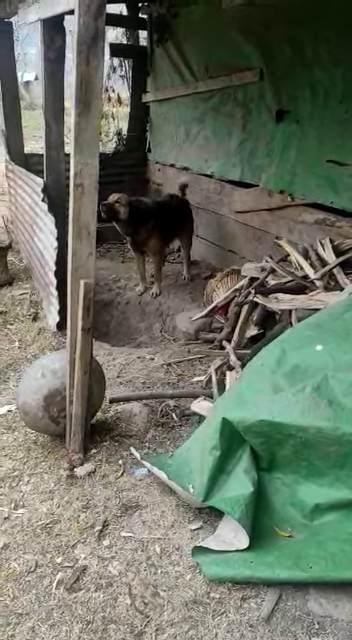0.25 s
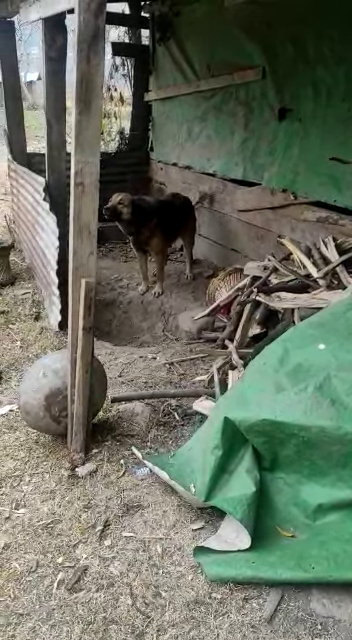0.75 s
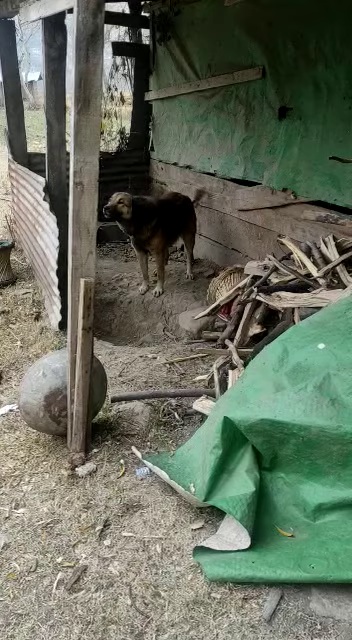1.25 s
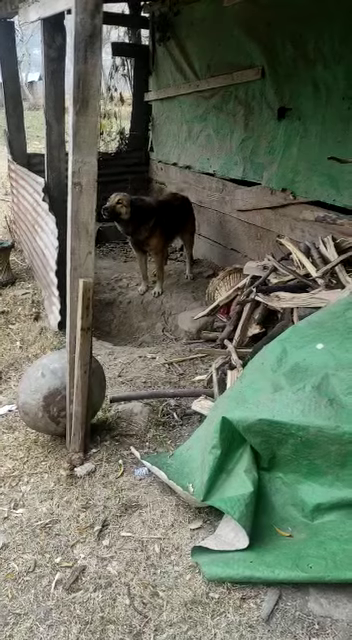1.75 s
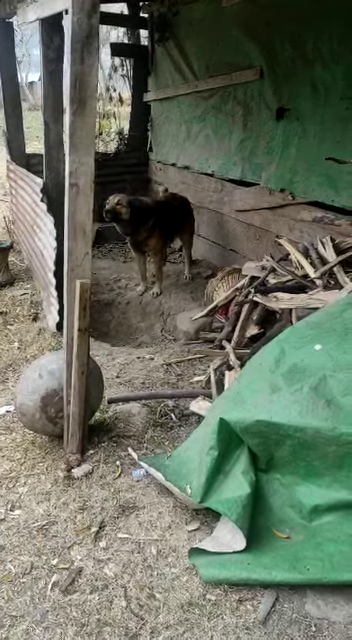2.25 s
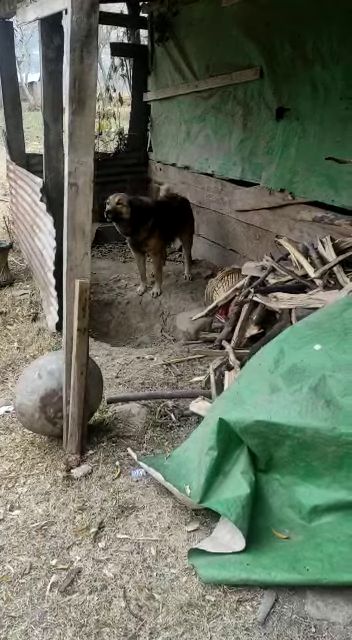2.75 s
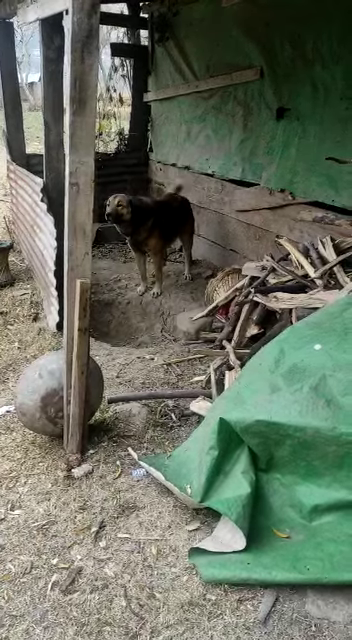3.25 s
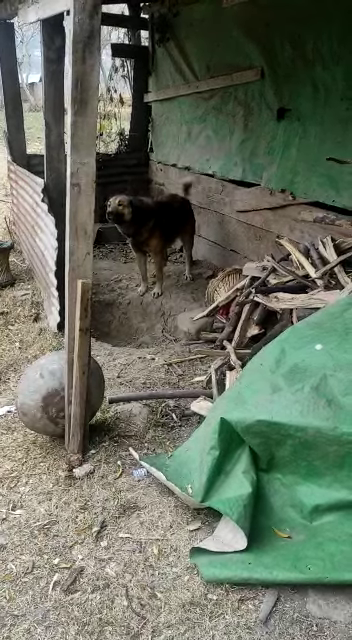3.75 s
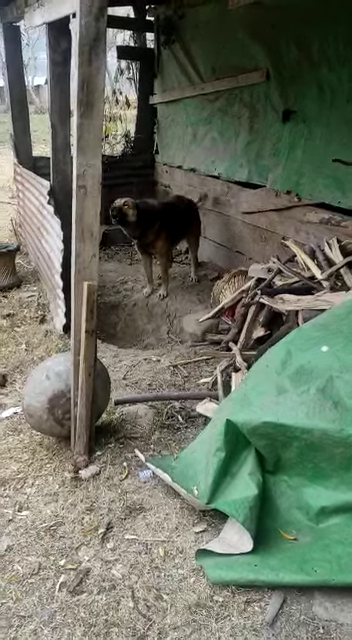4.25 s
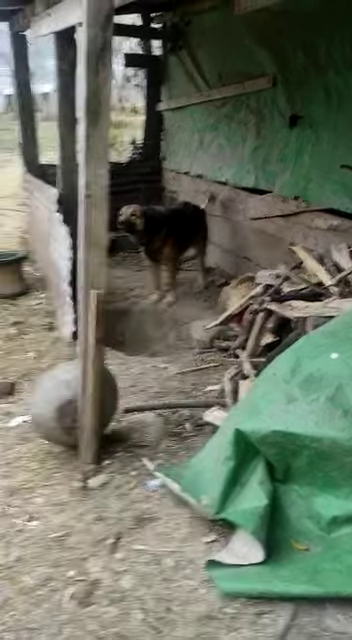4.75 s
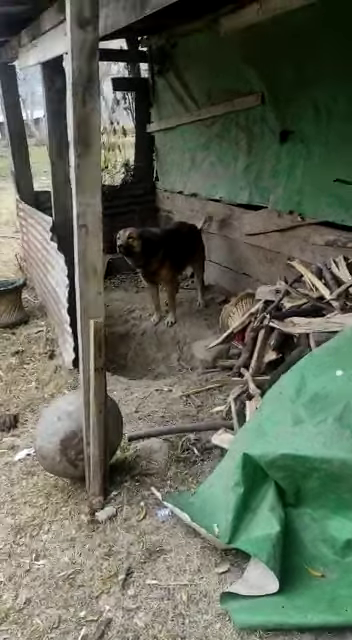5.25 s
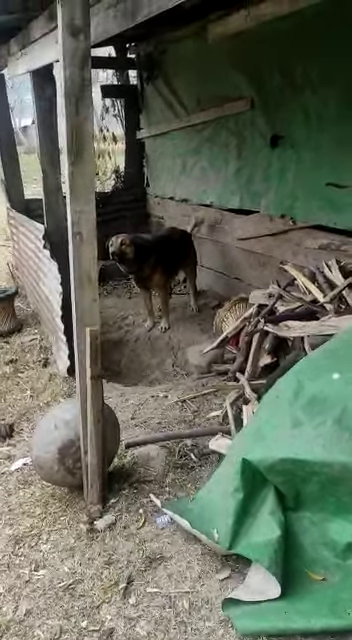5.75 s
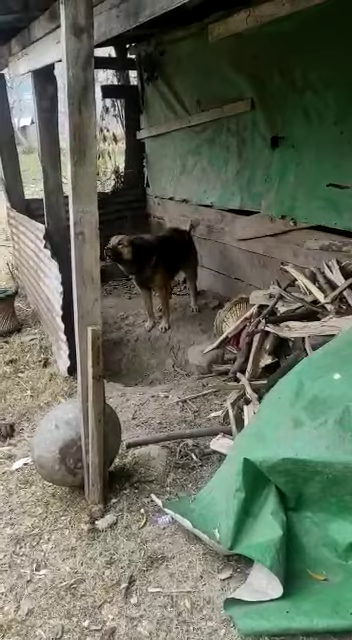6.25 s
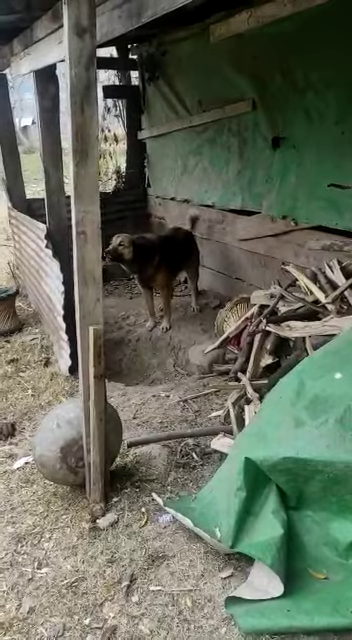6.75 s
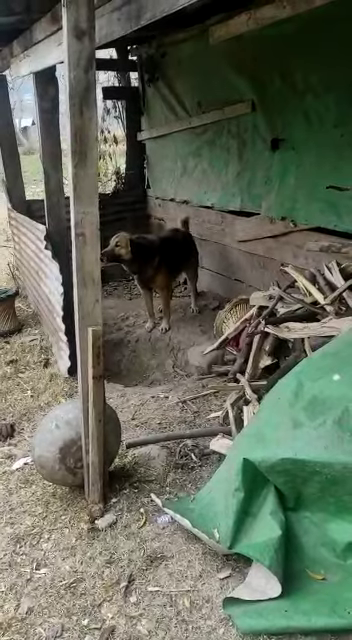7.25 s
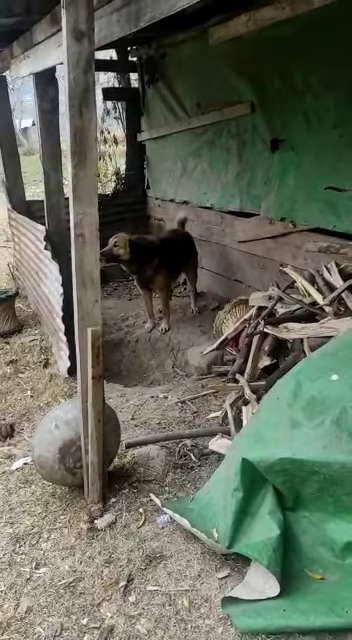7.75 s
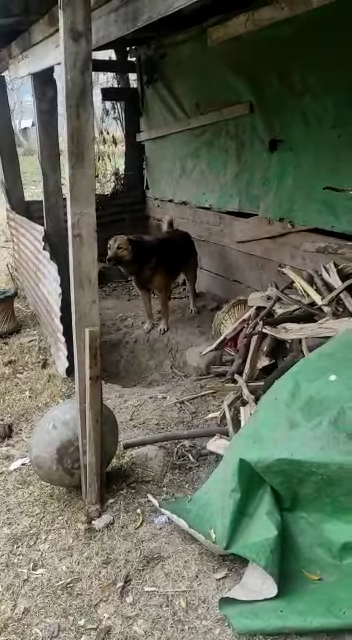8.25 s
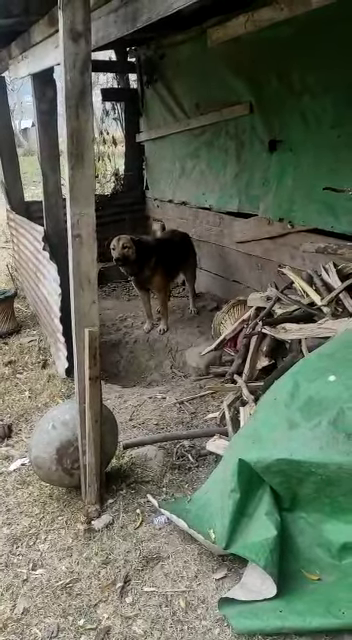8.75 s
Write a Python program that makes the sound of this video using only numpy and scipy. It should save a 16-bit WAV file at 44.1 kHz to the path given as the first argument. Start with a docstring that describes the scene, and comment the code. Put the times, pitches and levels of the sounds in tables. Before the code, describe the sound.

A large dog barks in short runs outdoors, with low growls and faint whines in the pauses.

```python
"""A yard with an open plank shed, where a large dog barks in short runs a few metres away.
Each bark starts as a rasp of flapping vocal folds, locks into a ringing arch of pitch and falls apart.
In the pauses slack folds growl, a thin whine comes through the nose and the jaw ticks shut.
The shed rings briefly and the yard echoes faintly over a bed of outdoor air;
in the second half, gusts brush the microphone."""
import sys
import numpy as np
from scipy import signal
from scipy.fft import irfft
from scipy.io import wavfile
from scipy.ndimage import map_coordinates

SR = 44100
rng = np.random.default_rng(int(sys.argv[2]) if len(sys.argv) > 2 else 0)


def store_pcm(level_fs):
    """Save levels as 16-bit WAV."""
    pcm = np.round(np.clip(level_fs, -1, 1) * 32767).astype(np.int16)
    wavfile.write(sys.argv[1], SR, np.atleast_2d(pcm).T)


N = 397771
T = np.arange(N) / SR

# the bed of outdoor air: (frequency [Hz], gain [dB])
YARD_AIR = [(25, -1.5), (60, -1), (130, -8.5), (300, -7.5), (600, -10.5), (1000, -21), (2000, -23),
            (4500, -38.5), (6000, -32), (8200, -24.5), (10300, -45.5), (15000, -53)]
# wind thumping on the microphone: (frequency [Hz], gain [dB])
WIND_BUFFET = [(15, 3), (45, 1.5), (90, -6), (160, -14.5), (300, -28.5), (700, -35), (2000, -64)]
# gusts: (peak time [s], half length [s], relative level [dB])
WIND_GUSTS = [(5.52, .04, -53), (5.66, .05, -49), (5.89, .05, -46), (6.25, .03, -46), (6.4, .05, -42),
              (6.54, .025, -45), (6.86, .09, -39), (7.09, .11, -40), (7.33, .035, -47), (7.45, .06, -44),
              (8.03, .06, -45.5), (8.26, .1, -50)]
# returns from the near planks, the whole shed and the yard: (frequency [Hz], gain [dB])
PLANK_SLAP = [(300, -24.5), (1000, -14.5), (1800, 1.5), (4000, 6.5), (12000, 4.5)]
SHED_REVERB = [(100, -3.5), (400, -8.5), (950, -19), (1500, -7), (3000, -8), (12000, -4)]
YARD_REVERB = [(100, -30.5), (400, -33), (1000, -34), (2300, -26.5), (5000, -28.5), (12000, -59)]
# posts and a tin wall shade the two microphone ports: (frequency [Hz], left minus right [dB])
PORT_SHADE = [(100, 2.5), (230, 6.5), (330, 5), (560, 2), (900, 5.5), (1300, 1), (2300, -3.5), (5000, -1.5),
              (6700, -12), (8300, 6.5), (15000, -3.5)]
# teeth and lips clicking: (time [s], peak level [dB])
JAW_CLICKS = [(.639, -50.5), (.98, -60), (2.59, -57)]
# whines: (start [s], length [s], top pitch [Hz], relative level [dB], flutter [share of pitch])
WHINE_CUES = [(.87, .26, 508, -60.5, .045), (1.53, .29, 492, -60, .05), (3.22, .25, 450, -70, .06),
              (3.74, .28, 466, -72, .055), (4.38, .24, 468, -73, .07), (8.84, .25, 395, -81, .04)]
# nasal resonances: (frequency [Hz], gain [dB])
NOSE_TONE = [(400, -12.5), (950, -9.5), (1450, -5.5), (1800, 2.5), (2030, 5.5), (2400, -17), (3200, -51),
             (4200, -38), (7000, -31)]
# growls: (start [s], length [s], top pulse rate [Hz], relative level [dB], fade [dB/s])
GROWL_CUES = [(.85, .29, 97, -49, 130), (1.497, .56, 93.5, -48.5, 21), (2.497, .16, 92, -51, 170),
              (4.67, .13, 85, -58, 200)]
# a growl's breath, and its fold slaps muffled by the nearly closed mouth: (frequency [Hz], gain [dB])
GROWL_BREATH = [(50, -18.5), (85, 5.5), (130, -16.5), (190, 9), (280, -3.5), (360, 7), (480, -3),
                (700, -6.5), (860, 1), (1200, -17), (1600, -13), (3200, -50), (5000, -40), (8500, -48),
                (10500, -71)]
GROWL_RUMBLE = [(50, -19.5), (85, -1.5), (130, -5.5), (200, 4.5), (280, -3.5), (360, 3), (480, -14.5),
                (700, -12.5), (860, -16), (1200, -23.5), (3200, -53.5), (10000, -72)]
# barks: (crest time [s], lead-in [s], top pitch [Hz], stretch [factor], tone trim [dB], chest trim [dB],
# rasp trim [dB], mouth trim [dB], hiss trim [dB], tone left minus right [dB])
BARK_CUES = [(.187, .104, 309, .95, -2.2, -1, 1.5, -2, 0, .5),
             (.534, .087, 312, 1.1, -5, 2.5, 3.5, -3.5, -2, -2.5),
             (2.137, .102, 335, 1.14, 1.5, -1, .5, -2, .5, -3.5),
             (2.957, .091, 326, 1.05, -2, .5, 2, -3, -1, 2),
             (3.597, .091, 332, .98, 0, -.5, -.5, 1, 3.5, -8),
             (3.973, .094, 321, 1.06, -1.5, -.5, -.5, -2, -.5, -2),
             (4.322, .085, 317, .87, 0, -2.5, 1, 1, 0, -1.5),
             (5.061, .083, 324, .98, -.5, -1, .5, 4.5, 5, -2),
             (5.947, .091, 326, 1.02, -1, 1, .5, -.5, .5, 2.5),
             (6.3, .090, 316, 1.0, .3, -1.5, -.5, 1, -.5, 1.5),
             (6.718, .097, 318, .94, 1.3, -2, -.5, 2, 0, .5),
             (7.113, .089, 318, .92, -1.8, 1, 2.5, -2, -.5, 1.5),
             (8.157, .097, 332, 1, .5, .5, 0, -.5, -1, -.5),
             (8.512, .092, 315, 1.01, -2, -.5, -3, -2.5, -2, 1)]
# the throat as the folds sound through it: (frequency [Hz], gain [dB])
THROAT_TONE = [(130, -18), (190, -8), (250, -13), (320, -12), (450, -5), (570, -4), (650, -19),
               (780, -15.5), (900, -1), (948, 3.5), (1000, -6), (1110, -13), (1300, -10), (1750, -41),
               (2280, -26)]
# the same tract under turbulent air, jaw open and jaw closing: (frequency [Hz], gain [dB])
RASP_OPEN = [(70, -23), (150, -20), (230, -10), (320, 1.5), (480, 5), (680, 0.5), (790, 0.5), (920, 8),
             (1090, -7.5), (1450, -2), (1850, -27.5), (2320, -9.5), (3200, -53), (5000, -52)]
RASP_CLOSING = [(70, -29), (130, -15.5), (185, 1.5), (260, -4), (320, -0.5), (430, 1), (540, 10),
                (790, -13), (930, -11), (1250, -16), (1700, -35.5), (3200, -56.5)]
# the open mouth's resonance, and air rushing over tongue and teeth: (frequency [Hz], gain [dB])
MOUTH_RING = [(1100, -19.5), (1500, -5.5), (1900, -8.5), (2320, 3.5), (2700, -7.5), (3300, -16),
              (4400, -42.5)]
TEETH_HISS = [(2000, -27), (3100, -5.5), (3800, -5), (4450, -12), (5000, 4), (6400, 3), (7500, -5.5),
              (8400, -3), (9200, -17.5), (9700, -32), (14500, -28.5)]
# layer envelopes of a bark, before its trims and stretch:
# (level [dB], rise [dB/s], hold before the crest [s], hold after it [s], fall [dB/s])
TONE_SWELL = (-16.9, 480, .023, .024, 450)
RASP_SWELL = (-31.4, 330, .046, .042, 330)
MOUTH_SWELL = (-45.7, 560, .048, .035, 360)
HISS_SWELL = (-48.5, 400, .044, .04, 540)


def undb(db):
    """Decibels to gain."""
    return 10 ** (np.asarray(db) / 20)


def colour(x, spectrum, size=8192):
    """Ring a sound through a resonant body with this (frequency [Hz], gain [dB]) curve."""
    hz, db = np.transpose(spectrum)
    bins_hz = np.maximum(np.abs(np.fft.fftfreq(size, 1 / SR)), 1)
    log_gain = np.log(undb(np.interp(np.log(bins_hz), np.log(hz), db)))
    minimum_phase = np.exp(signal.hilbert(log_gain).conj())[:size // 2 + 1]
    ring = irfft(minimum_phase)[:size // 2]
    return signal.oaconvolve(x, ring if x.ndim == 1 else ring[None], axes=-1)[..., :x.shape[-1]]


def shift(x, factor):
    """Varispeed: slide all resonances of a noise by a moving factor."""
    return map_coordinates(x, [np.cumsum(factor)], order=3, mode="mirror")


def unit(x):
    """Scale to rms 1."""
    return x / np.sqrt(np.mean(x ** 2))


def wander(t, rate):
    """Smooth random drift with a spread near 1, changing rate times a second."""
    return map_coordinates(rng.standard_normal(4096), [(t - t[0]) * rate], order=3, mode="wrap")


def swell(age, db, rise_db_per_s, before, after, fall_db_per_s):
    """An envelope that rises, holds around age zero and falls."""
    early, late = np.maximum(-before - age, 0), np.maximum(age - after, 0)
    return undb(db - rise_db_per_s * early - fall_db_per_s * late)


def ramp(age, length):
    """A linear fade from 0 to 1."""
    return np.clip(age / length, 0, 1)


def bell(x, width):
    """A smooth hump, 1 at zero."""
    return np.exp(-(x / width) ** 2)


def span(start, end):
    """The sample times between two moments."""
    return T[(T >= start) & (T < end)]


def add(track, t, sound):
    """Lay a sound on a track at its times."""
    i = round(t[0] * SR)
    track[..., i:i + len(t)] += sound


def yard(db=-69, side_db=-4):
    """A faint, wide bed of slowly wavering outdoor air."""
    mid, side = unit(colour(rng.standard_normal((2, N)), YARD_AIR))
    side = side * undb(side_db)
    return np.array([mid + side, mid - side]) * undb(db + 1.2 * wander(T, 4))


def breeze(start_s=5.3, left_db=3, right_db=-10, eddy_db=3):
    """Gusts ride on a light breeze; their eddies thump on each port separately, mostly the left."""
    light = undb(-63) * ramp(T - start_s, .15)
    gusts = sum(undb(db) * bell(T - at, half) for at, half, db in WIND_GUSTS)
    buffet = unit(colour(rng.standard_normal((2, N)), WIND_BUFFET))
    eddies = buffet * (light + gusts) * undb(eddy_db * wander(T, 22))
    return eddies * undb([[left_db], [right_db]])


def reverb(x, spectrum, t60, delay, build):
    """Scattered reflections build up and die away, different at each port; times in seconds."""
    t = span(0, 1.2)
    late = np.maximum(t - delay, 0)
    shape = (1 - np.exp(-late / build)) * np.exp(-np.log(1000) * late / t60)
    scatter = rng.standard_normal((2, len(t))) * shape / np.sqrt(np.sum(shape ** 2))
    return signal.fftconvolve(x, colour(scatter, spectrum), axes=1)[:, :N]


def shed(dog, port_lag_ms=.115, head_swing_hz=.6):
    """The direct sound reaches the right port first; planks, shed and yard answer after it."""
    direct = np.array([np.roll(dog[0], round(port_lag_ms * SR / 1000)), dog[1]])
    ring = reverb(dog, SHED_REVERB, t60=.1687, delay=.0062, build=.006)
    echo = reverb(dog, YARD_REVERB, t60=.97, delay=.03, build=.01)
    # the head swings slowly, so the near planks answer each bark a little differently
    swing = 2 * np.pi * head_swing_hz * T + wander(T, 3)
    planks = sum(reverb(dog * share, PLANK_SLAP, t60=.013, delay=.0006, build=.0003)
                 for share in (np.cos(swing), np.sin(swing)))
    left, right = direct + planks + ring + echo
    return np.array([colour(left, [(hz, db / 2) for hz, db in PORT_SHADE]),
                     colour(right, [(hz, -db / 2) for hz, db in PORT_SHADE])])


def folds(hz, harmonics):
    """Vocal fold pulses with equal harmonics, and the phase of their cycle."""
    phase = 2 * np.pi * np.cumsum(hz) / SR
    return np.sqrt(2) * np.cos(np.arange(1, harmonics + 1)[:, None] * phase).sum(0), phase


def puffs(phase, spectrum, depth):
    """Turbulent air let through once a fold cycle."""
    return unit(colour(rng.standard_normal(len(phase)) * np.exp(depth * np.cos(phase)), spectrum))


def clicks(decay_s=.00054):
    """Tiny bright ticks of the closing jaw."""
    out = np.zeros(N)
    for start, db in JAW_CLICKS:
        t = span(start, start + .02)
        tick = colour(rng.standard_normal(len(t)) * np.exp(-(t - start) / decay_s), TEETH_HISS)
        add(out, t, undb(db) * tick / np.abs(tick).max())
    return out


def whines(attack_s=.075, release_s=.04, edge_db=17, flutter_hz=85):
    """A thin, fluttering tone through the nose scoops up to its top pitch, then sags."""
    out = np.zeros(N)
    top_at, scoop, sag = .3, .07, .13  # share of the length; shares of the pitch
    for start, length, top_hz, db, flutter in WHINE_CUES:
        t = span(start, start + length)
        past_top = (t - start) / length - top_at
        droop = np.where(past_top < 0, scoop * (past_top / top_at) ** 2,
                         sag * (past_top / (1 - top_at)) ** 2)
        hold_s = length - attack_s - release_s
        gain = swell(t - start - attack_s, db, edge_db / attack_s, 0, hold_s, edge_db / release_s)
        shake = np.sin(2 * np.pi * flutter_hz * t) + .4 * wander(t, 170)
        pulses, _ = folds(top_hz * (1 - droop) * (1 + flutter * shake), harmonics=12)
        add(out, t, gain * colour(pulses, NOSE_TONE))
    return out


def growls(slack_hz=79, push_s=.07, relax_s=.085, attack_s=.022, hold_s=.058):
    """One push of air sets slack folds slapping unevenly; they slow down as it fades."""
    out = np.zeros(N)
    for start, length, top_hz, db, fade_db_per_s in GROWL_CUES:
        t = span(start, start + length)
        age = t - start
        hz = slack_hz + (top_hz - slack_hz) / (1 + ((age - push_s) / relax_s) ** 2)
        gain = swell(age - attack_s, db, 650, 0, hold_s, fade_db_per_s) * ramp(t[-1] - t, .03)
        cycles = np.cumsum(hz * (1 + .025 * wander(t, 90))) / SR
        slaps = np.diff(np.floor(cycles), prepend=0) * undb(3.1 * wander(t, 82))
        # the loose lips shudder after each slap and soften it
        shudder = rng.standard_normal(len(t)) * np.exp(-age / .0045)
        softened = unit(signal.fftconvolve(slaps, shudder)[:len(t)])
        rumble = unit(colour(unit(slaps) + .6 * softened, GROWL_RUMBLE))
        # hoarse on the first push of air, then it settles
        breath = (.59 + .82 * np.exp(-age / .1277)) * puffs(2 * np.pi * cycles, GROWL_BREATH, depth=.51)
        add(out, t, gain * (rumble + breath))
    return out


def pitch_arch(age, slack=.38, rise_s=.057, fall_s=.056, squareness=2.7):
    """Pitch as a share of the top: up from slack folds to the crest and back."""
    from_crest = np.maximum(-age / rise_s, age / fall_s)
    return slack + (1 - slack) / (1 + from_crest ** squareness)


def bark_voice(t, hz, gain, rough, chest_db):
    """Folds sound through the throat, jittering when rough; gives the voice and its phase."""
    jitter = .12 * rough * wander(t, 350)
    pulses, phase = folds(hz * (1 + jitter), harmonics=7)
    pulses *= 1 + .8 * rough * np.sin(phase / 2)  # strong and weak pulses alternate
    pulses += (undb(chest_db) - 1) * np.sqrt(2) * np.cos(phase)  # the chest weights the fundamental
    shimmer = (1 + .5 * rough * wander(t, 300)) * undb(1.1 * wander(t, 70))
    return colour(pulses * gain * shimmer, THROAT_TONE), phase


def jaw_rasp(age, phase, open_before_s=.04, open_after_s=.025, move_s=.03, start_shut=.12):
    """Gritty air in the throat, darker before the jaw is fully open and as it closes."""
    shut = ramp(age - open_after_s, move_s) + np.clip((-age - open_before_s) / move_s, 0, start_shut)
    bright = puffs(phase, RASP_OPEN, depth=.99)
    dark = puffs(phase, RASP_CLOSING, depth=.9)
    return np.sqrt(1 - shut) * bright + np.sqrt(shut) * dark


def barks(attack_s=.018, release_s=.03, lock_dip_db=6.5):
    """The folds flap irregularly at both ends of a bark and lock into a clean tone at its crest."""
    out = np.zeros((2, N))
    for crest, lead, top_hz, stretch, tone_db, chest_db, rasp_db, mouth_db, hiss_db, pan_db in BARK_CUES:
        t = span(crest - lead, crest + .16)
        age = (t - crest) / stretch
        sag_db = 70 * age  # the air runs out
        lock_db = lock_dip_db * bell(age, .022)  # the rasp ducks while the folds are locked
        teeth_db = 35 * age  # the hiss grows as the teeth come together
        tone_gain = swell(age, *TONE_SWELL) * undb(tone_db - sag_db)
        rasp_gain = swell(age, *RASP_SWELL) * undb(rasp_db - sag_db - lock_db)
        mouth_gain = swell(age, *MOUTH_SWELL) * undb(mouth_db - sag_db)
        hiss_gain = swell(age, *HISS_SWELL) * undb(hiss_db + teeth_db)
        rough = rasp_gain / (rasp_gain + tone_gain)
        voice, phase = bark_voice(t, top_hz * pitch_arch(age), tone_gain, rough, chest_db)
        rasp = rasp_gain * jaw_rasp(age, phase)
        # the mouth resonances rise as the lips draw back, never twice alike
        lips = (1.05 + age) * (1 + .015 * wander(t, 25))
        mouth = mouth_gain * shift(puffs(phase, MOUTH_RING, depth=1.2), lips)
        hiss = hiss_gain * shift(puffs(phase, TEETH_HISS, depth=.46), lips)
        pan = undb([[pan_db / 2], [-pan_db / 2]])
        gate = ramp(t - t[0], attack_s) ** 2 * ramp(t[-1] - t, release_s)
        add(out, t, gate * (voice * pan + rasp + mouth + hiss))
    return out


def scene():
    """The dog in its shed, over the breeze and the air of the yard."""
    return shed(barks() + growls() + whines() + clicks()) + breeze() + yard()


def record(dry):
    """A steep low-pass takes off the very top."""
    top_hz = 15650
    return signal.sosfilt(signal.ellip(10, .2, 80, top_hz, fs=SR, output="sos"), dry)


dry = scene()
out = record(dry)
store_pcm(out)
```